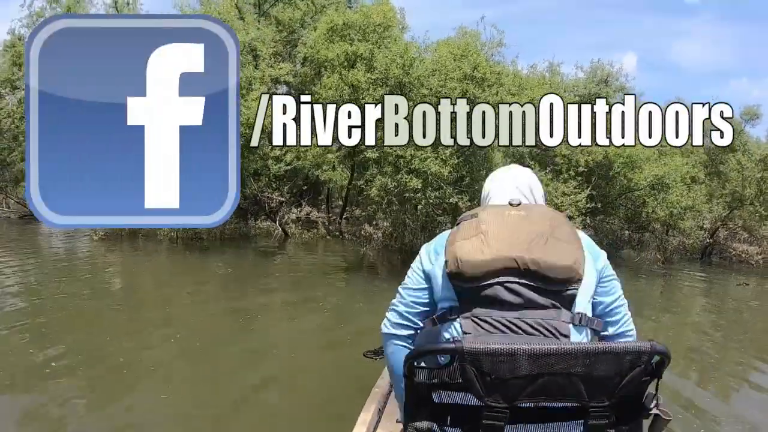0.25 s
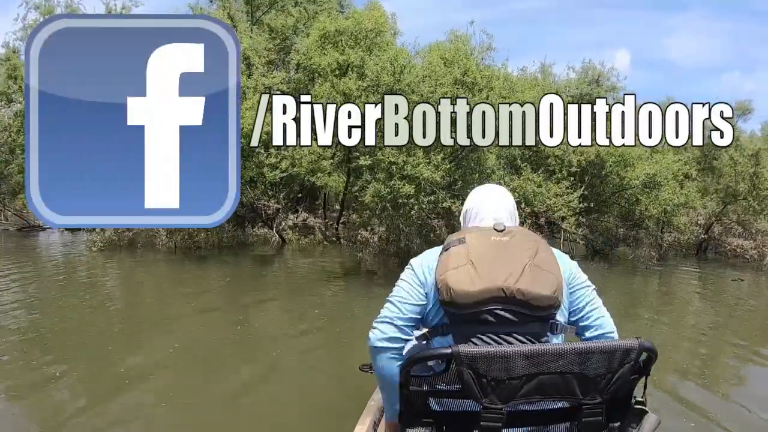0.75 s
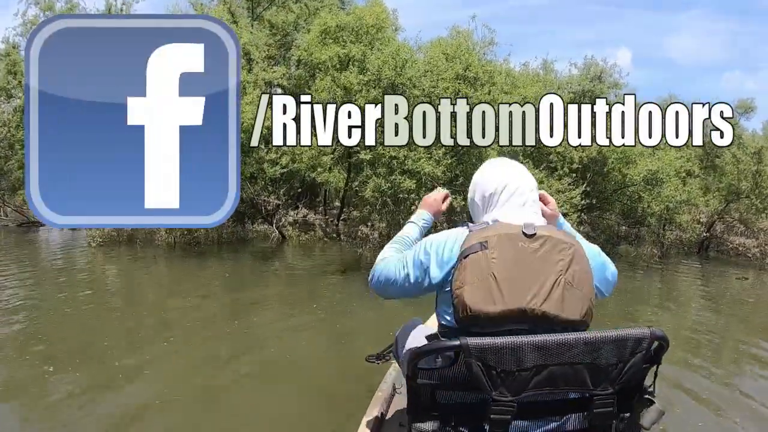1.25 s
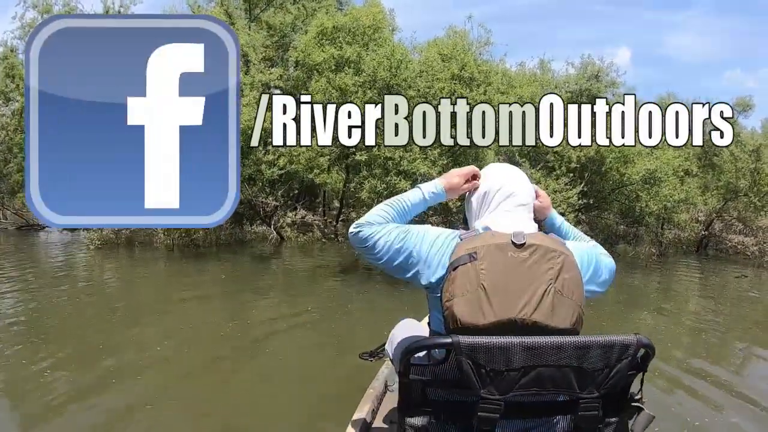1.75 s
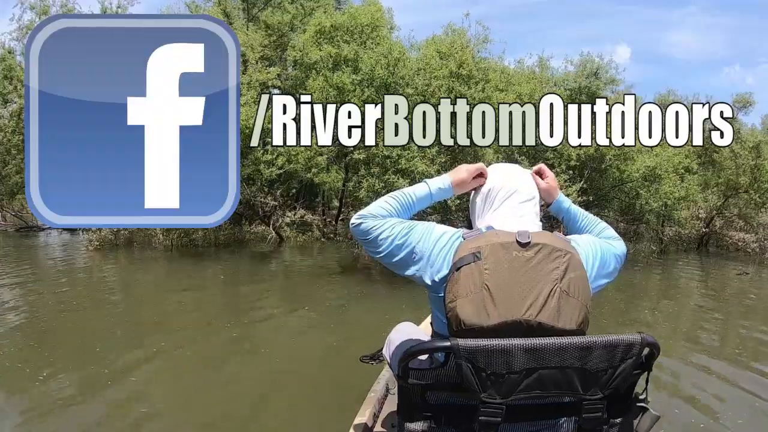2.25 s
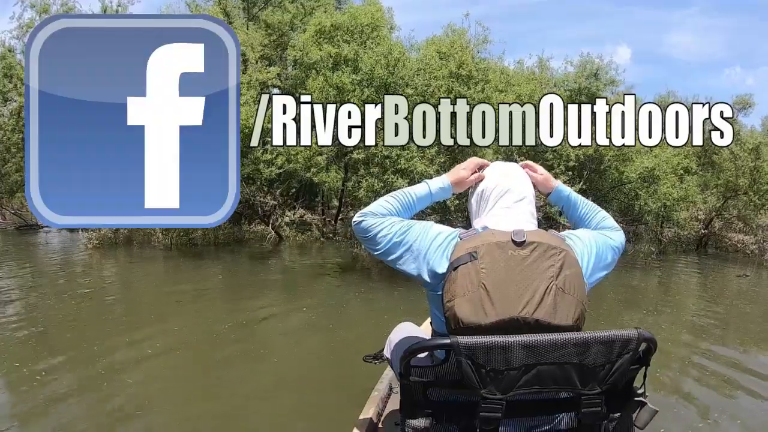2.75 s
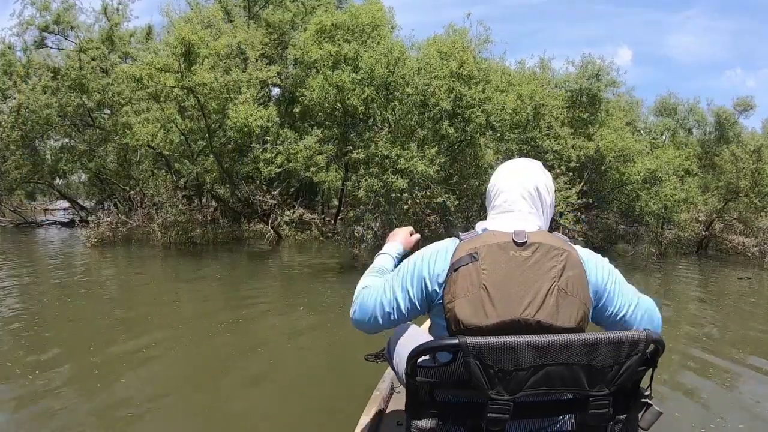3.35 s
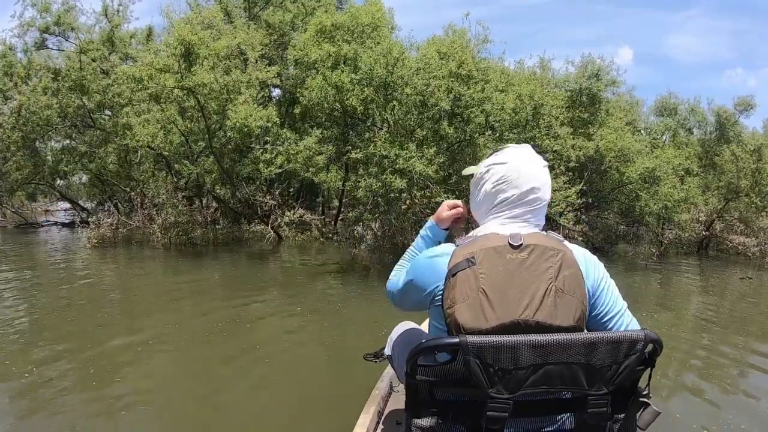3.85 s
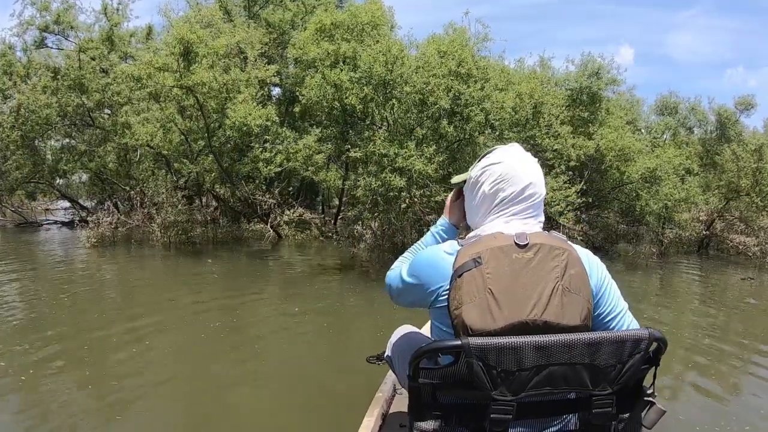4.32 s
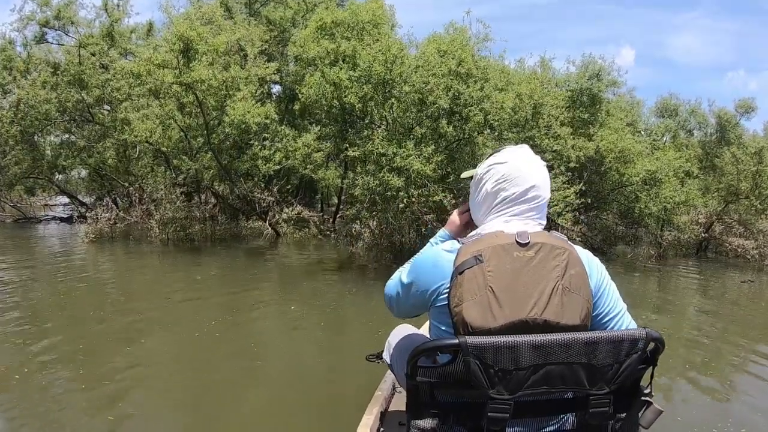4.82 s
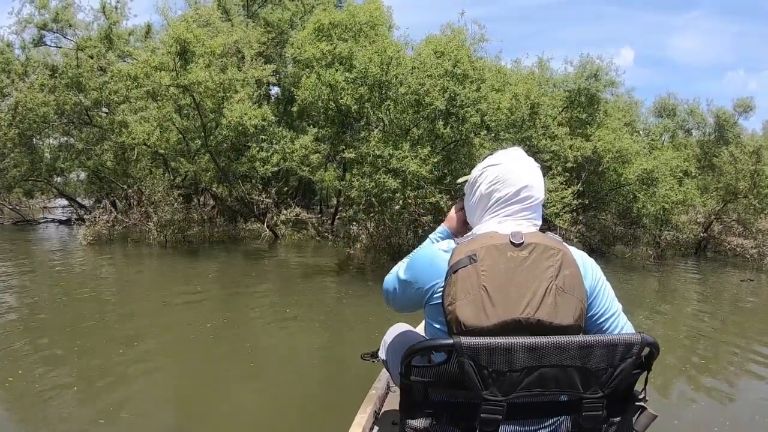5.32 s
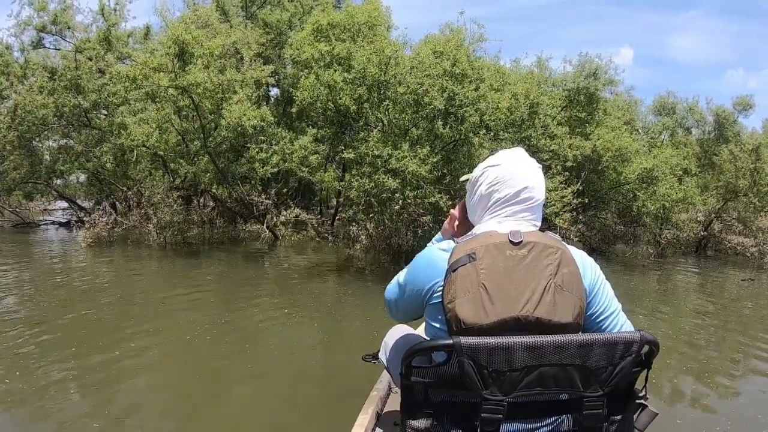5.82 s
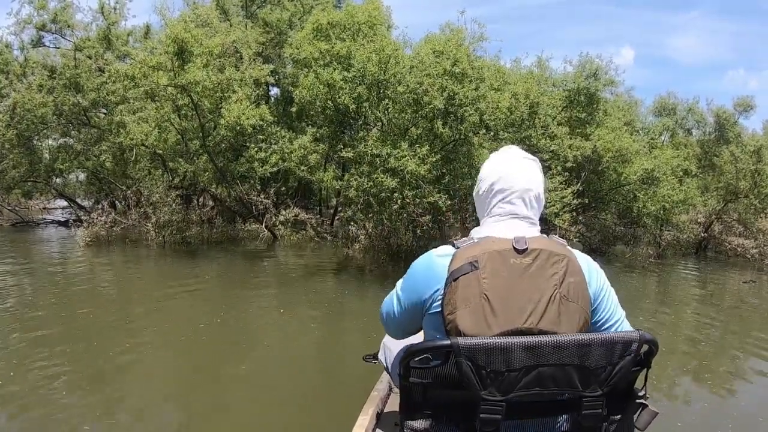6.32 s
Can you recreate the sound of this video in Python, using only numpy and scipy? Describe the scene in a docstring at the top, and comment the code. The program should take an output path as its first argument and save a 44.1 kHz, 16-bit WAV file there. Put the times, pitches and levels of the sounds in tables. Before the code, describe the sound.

Stereo, from the stern of a small boat beside a wooded bank. From 0 to 1.1 s the near right side is busy: low hull rumbles and lurches, seat scuffing, cloth and gear swishing around 0.3 s, tiny drops near 0.5 s, a sharp bright knock with a hollow thud at 0.57 s, loose rattling from 0.7 to 0.87 s, a loud short plip at 0.97 s and a dull tap at 1.07 s. At about 1.16 s a small electric motor starts, glides upward for under a second, and hums low and steady to the end at 6.5 s, creeping slightly higher after 4 s. A far engine drones beneath a murmur and slowly freshening breeze. Left of centre, songbirds warble from 1.5 s; arched whistles repeat between 3 and 4 s, short chirps come at 5.3 and 6.1 s, with thin peeps, faint twitters and hoots near 2.6 and 5.7 s, softly echoed by trees.

```python
"""A lake by a wooded bank, heard from the stern of a kayak with two microphones.
Far off, an engine drones in a few steady tones under a murmur and a light breeze of coloured noise.
Close by, on the right, gear slides as noise and knocks as damped modes, and drops fall as short bubbles.
A small electric motor spins up and hums as three orders of its shaft speed.
On the left, songbirds chirp and whistle in gliding tones, which the trees scatter into a soft echo."""
import sys
import numpy as np
from scipy import signal
from scipy.fft import rfft, irfft, next_fast_len
from scipy.io import wavfile
from scipy.ndimage import map_coordinates

SR = 44100
rng = np.random.default_rng(int(sys.argv[2]) if len(sys.argv) > 2 else 0)


def transcribe(signal):
    """Save signal, clipped to [-1, 1], as a 16-bit WAV file at the path in sys.argv[1]."""
    frames = np.atleast_2d(signal).T
    limited = np.clip(frames, -1, 1)
    pcm = np.round(limited * 32767).astype(np.int16)
    wavfile.write(sys.argv[1], SR, pcm)


N = 290001  # length [samples]


def amp(db):
    """Decibels to gain."""
    return 10 ** (np.asarray(db) / 20)


def unit(x):
    """Scale to rms 1."""
    return x / np.sqrt(np.mean(x ** 2) + 1e-20)


def along(points, hz):
    """Read (frequency [Hz], value) points on a log frequency axis."""
    f, v = np.transpose(points)
    return np.interp(np.log(hz + 1), np.log(f + 1), v)


def wobble(rate, size=16):
    """A smooth random curve, rate knots a second, drawn every size samples."""
    at = np.arange(0, N, size)
    knots = rng.standard_normal(int(N * rate / SR) + 4)
    return np.interp(np.arange(N), at, map_coordinates(knots, [at * rate / SR]))


def filtered(x, response):
    """x times a response of frequency."""
    size = next_fast_len(N + SR // 2)
    return irfft(rfft(x, size) * response(np.fft.rfftfreq(size, 1 / SR)), size)[..., :N]


def pan(left_db):
    """Microphone gains, averaging 1, for a left-minus-right level."""
    gains = amp([[left_db / 2], [-left_db / 2]])
    return gains / gains.mean()


def noise(spectrum, side_db):
    """Coloured stereo noise of rms 1; side_db sets its width, side re mid."""
    mid, side = filtered(rng.standard_normal((2, N)), lambda hz: amp(along(spectrum, hz)))
    side = amp(side_db) * side
    return unit(np.array([mid + side, mid - side]))


def add(track, s, sound):
    """Mix a sound into a track at time s."""
    start = round(s * SR)
    part = sound[..., max(-start, 0):N - start]
    track[..., max(start, 0):][..., :part.shape[-1]] += part


def stroke(start, end, rise_s, fall_s):
    """A gain that swells, holds at 1 from start to end and dies away; rise_s and fall_s are per 60 dB."""
    t = np.arange(N) / SR
    before, after = np.maximum(start - t, 0), np.maximum(t - end, 0)
    return np.exp(-np.log(1000) * (before / rise_s + after / fall_s))


STRAY_HZ = 1340  # by this pitch a mode reaches the two microphones about a radian apart


def ring(modes, t, shift=0.0):
    """Damped modes, struck at slightly new strengths and pitches; the left microphone hears high ones out of step."""
    total = 0
    for k, (hz, db, t60) in enumerate(modes):
        strength, stray, tune = rng.standard_normal(3)
        phase = np.array([[stray * hz / STRAY_HZ], [0]])
        tone = np.sin(2 * np.pi * hz * (1 + shift * tune) * t + phase)
        total = total + (-1) ** k * amp(db + strength - 60 * t / t60) * tone
    return total


# the shadow on near sounds from the right: (frequency [Hz], left minus right [dB])
SHADOW = [(60, -2), (150, -2), (500, -2.5), (1000, -8), (1800, -15.5), (5500, -6), (9000, -1)]
LAG_S = .000026  # the left microphone hears them this much later


def on_deck(x):
    """A near sound on the right reaches the left microphone shadowed and LAG_S later."""
    def ports(hz):
        left_db = along(SHADOW, hz)
        gains = amp([left_db / 2, -left_db / 2])
        lag = np.exp(np.pi * 1j * hz * LAG_S * np.array([[-1], [1]]))
        return gains / gains.mean(axis=0) * lag
    return filtered(x, ports)


# colour of the low outdoor murmur: (frequency [Hz], level [dB per Hz])
MURMUR = [(50, -15), (100, -0.5), (170, -0.5), (240, -6), (330, -5), (450, -19), (700, -29.5), (2000, -120)]
# colour of the breeze in the leaves: (frequency [Hz], level [dB per Hz])
BREEZE = [(240, -29), (400, -5), (458, -2.5), (708, -8), (867, -2), (1020, -10.5), (1200, -4.5),
          (1560, -13), (3510, -19.5), (4670, -29.5), (7120, -36.5), (10300, -49), (13400, -79),
          (22000, -120)]
MURMUR_DB = -52.5
BREEZE_DB, BREEZE_DB_PER_S = -67.5, 1.375  # level at first; the breeze slowly freshens


def air():
    """A low outdoor murmur and a light, freshening breeze in the leaves: noise with slow random swells."""
    breeze_db = BREEZE_DB + BREEZE_DB_PER_S * np.arange(N) / SR
    swell, gust = 1.6 * wobble(5), .7 * wobble(4)
    murmur = amp(MURMUR_DB + swell) * noise(MURMUR, side_db=-11.5)
    return murmur + amp(breeze_db + gust) * noise(BREEZE, side_db=-1.5) * pan(1)


# the far engine's steady orders: (frequency [Hz], level [dB])
DRONE = [(126.5, -54), (189.8, -57.5), (253, -56.5), (506, -74)]
DRONE_PEAK_S, DRONE_FADE_DB_PER_S = 3.72, 1  # loudest then, and fainter before and after


def far_engine():
    """A steady drone that slowly swells and recedes; its orders fade in and out on their way over the water."""
    t = np.arange(N) / SR
    drone = 0
    for hz, db in DRONE:
        fading = amp(db + 3.4 * wobble(2.624))
        drone = drone + fading * np.sin(2 * np.pi * hz * t + 0.19 * wobble(5.1))
    return np.sqrt(2) * drone * amp(-DRONE_FADE_DB_PER_S * np.abs(t - DRONE_PEAK_S)) * pan(0)


# colour of sliding cloth, and of the spray from a drop: (frequency [Hz], level [dB per Hz])
SWISH = [(200, -7.5), (450, -11), (900, -5.5), (1700, 1), (2600, 0), (4000, -8), (5500, -7), (7200, -7),
         (10000, -16), (13000, -43)]
CRINKLES_PER_S = 240


def crinkles():
    """Sparse tiny snaps of cloth, of uneven size, rms 1."""
    snaps = (rng.random(N) < CRINKLES_PER_S / SR) * rng.uniform(-1, 1, (2, N))
    return unit(filtered(snaps, lambda hz: amp(along(SWISH, hz))))


# the hull lurches as weight shifts or a ripple meets it: (time [s], level [dB], t60 [s])
LURCHES = [(0, -36, 0.34), (.16, -35, 0.27), (.21, -33, 0.3), (0.284, -29, 0.13), (0.394, -39.5, 0.28),
           (.6, -34.5, 0.96), (.87, -39, 0.11), (1.08, -40.5, 0.44), (5.15, -51.5, 1.1)]
# colour of the hull's rumble: (frequency [Hz], level [dB per Hz])
RUMBLE = [(15, -18), (30, -11.5), (57, 7.5), (85, -4.5), (118, 1.5), (160, -17), (300, -44), (600, -120)]
# colour of its deep heave: (frequency [Hz], level [dB per Hz])
HEAVE = [(15, -11.5), (28, 0.5), (42, 2.5), (90, -21.5), (200, -120)]
# small ticks of buckles and cloth: (time [s], level [dB])
TICKS = [(0.143, -55.5), (0.18, -52.5), (0.989, -55.5), (5.92, -63)]
# colour of the scuffing on the seat: (frequency [Hz], level [dB per Hz])
SCUFF = [(50, -21), (100, 5), (170, 3), (240, -2.5), (330, -6), (450, -17.5), (900, -20), (1500, -25),
         (3500, -27), (7000, -55), (12000, -79)]
LURCH_RISE_S, ROCKING_DB, HEAVE_DB = 0.086, -60, -7.5  # swell per 60 dB; steady rocking; heave re the lurch
SLIDE_S, SLIDE_END_S, SLIDE_DB = 0.29, 0.38, -55.5  # cloth and gear slide at full level between these times
SLIDE_RISE_S, SLIDE_FALL_S = 0.99, 1.3  # times to swell and fade by 60 dB
RUSTLE_DB, CRINKLE_DB = -76.5, -12.5  # faint steady rustle; the snaps re the slide
TICK_RISE_S, TICK_T60_S = 0.0044, 0.04
SHUFFLE_END_S, SHUFFLE_FALL_S, SHUFFLE_DB = 0.78, 0.95, -44.5  # when scuffing stops, its t60, its level


def boat():
    """The hull rumbles and heaves over a gentle rocking, cloth and gear swish and the seat is scuffed: shaped noise."""
    powers = [(amp(db) * stroke(s, s, LURCH_RISE_S, t60)) ** 2 for s, db, t60 in LURCHES]
    lurch = np.sqrt(sum(powers))
    lumps_db = 1.5 * wobble(4) + 2 * wobble(14)
    rumble = np.hypot(lurch, amp(ROCKING_DB)) * amp(lumps_db) * noise(RUMBLE, side_db=-11.5)
    heave = amp(HEAVE_DB) * lurch * noise(HEAVE, side_db=0)

    slide = amp(SLIDE_DB) * stroke(SLIDE_S, SLIDE_END_S, SLIDE_RISE_S, SLIDE_FALL_S)
    ticks = sum(amp(db) * stroke(s, s, TICK_RISE_S, TICK_T60_S) for s, db in TICKS)
    rubbing = np.hypot(slide + ticks, amp(RUSTLE_DB)) * amp(1.0 * wobble(60))
    swish = rubbing * noise(SWISH, side_db=-2.5)
    crinkle = amp(CRINKLE_DB) * slide * crinkles()

    shuffle = amp(SHUFFLE_DB + 2.6 * wobble(21)) * stroke(0, SHUFFLE_END_S, 1, SHUFFLE_FALL_S)
    scuff = shuffle * noise(SCUFF, side_db=-9.0)
    return on_deck(rumble + heave + swish + crinkle) + scuff


# drops on the water: (time [s], starting pitch [Hz], level [dB], t60 [s], splash re bubble [dB])
DROPS = [(.492, 6700, -38, .029, -3.5), (.528, 2040, -41, 0.04, -19.5), (.923, 2000, -52, 0.064, -5.5),
         (.973, 1415, -19, 0.024, -23.5)]


def drops():
    """A tick of splash with a small bubble whose pitch rises as it dies."""
    water, t = np.zeros((2, N)), np.arange(SR // 10) / SR
    spray = noise(SWISH, side_db=-1)
    for s, hz, db, t60, splash_db in DROPS:
        tone = np.sin(2 * np.pi * hz * t * (1 + 0.0192 * t / t60))
        bubble = tone * amp(-60 * t / t60) * (1 - np.exp(-t / 0.00097))
        splash = spray[:, round(s * SR):][:, :len(t)] * amp(splash_db - 60 * t / 0.021)
        add(water, s, amp(db) * (bubble + splash))
    return on_deck(water)


# gear striking the hull:
# (time [s], piece, level [dB], thud re blow [dB], brightness [Hz], chatter [dB], chatter t60 [s])
KNOCKS = [(.567, "gear", -20.5, 1, 8860, 1, 0.045), (.698, "loose", -37, -6, 4800, 4, 0.047),
          (.765, "loose", -44, 2, 4500, 3, .04), (.804, "loose", -44, -3, 1470, 8, 0.088),
          (.824, "loose", -51, -3, 1990, -2, .06), (.842, "loose", -53, -1, 2400, 0, 0.14),
          (.871, "loose", -52.5, 3.5, 990, 10.5, 0.06), (1.07, "loose", -52.5, 10, 595, 12, 0.1)]
# what the gear rings with: (frequency [Hz], level [dB], t60 [s])
GEAR = [(441, -12, 0.11), (630, -12, 0.093), (841, -16, .076), (1154, -17, 0.094), (1477, 0, 0.098),
        (2083, -5.5, 0.042), (2400, 4.5, 0.037), (2940, -4.5, 0.026), (3987, -1.5, 0.04),
        (4420, -5.5, .035), (5110, -9.5, 0.073), (6120, -5.5, .027), (6800, -7, .038)]
# what the loose piece rings with as it rattles to rest: (frequency [Hz], level [dB], t60 [s])
LOOSE = [(436.4, -1.5, 0.15), (854, -2, 0.071), (1146, -5, 0.086), (1592, -1, 0.092), (1806, 3.5, 0.067),
         (2025, 0, 0.049), (2880, 2, 0.042), (4270, -12, .04)]
# the hollow hull: (frequency [Hz], level [dB], t60 [s])
HULL = [(133.5, -2.5, 0.18), (226.6, -1, 0.17), (262.4, 4, 0.081), (322, -8.5, 0.1)]
# colour of the chatter: (frequency [Hz], level [dB per Hz])
CHATTER = [(250, -13.5), (600, -1.5), (1000, -4), (1700, -3.5), (2500, -10.5), (4000, -11), (7000, -17),
           (10000, -27), (13000, -44)]
# each piece's modes, and the share by which they shift with the way it lands
RINGS = {"gear": (GEAR, 0), "loose": (LOOSE, .025)}
CONTACT_S, THUD_S = 0.00069, 0.0026  # time constants in which a blow and its thud build


def knocks():
    """Each blow rings the piece that strikes, chatters for a moment, is dulled by a low-pass and thuds in the hull."""
    gear, hull, t = np.zeros((2, N)), np.zeros((2, N)), np.arange(SR // 2) / SR
    grit = noise(CHATTER, side_db=-3) * amp(3.5 * wobble(420))
    for s, piece, db, thud_db, bright_hz, chatter_db, t60 in KNOCKS:
        chatter = grit[:, round(s * SR):][:, :len(t)] * amp(chatter_db - 60 * t / t60)
        contact = signal.butter(2, min(bright_hz, SR / 3), fs=SR, output="sos")
        modes, shift = RINGS[piece]
        blow = (ring(modes, t, shift) + chatter) * (1 - np.exp(-t / CONTACT_S))
        add(gear, s, amp(db) * signal.sosfilt(contact, blow))
        add(hull, s, amp(db + thud_db) * ring(HULL, t) * (1 - np.exp(-t / THUD_S)))
    return on_deck(gear + hull)


START_S, START_HZ, CRUISE_HZ = 1.16, 98.25, 144.86  # the motor takes hold; shaft speed at first and cruising
SPIN_UP_S = .4  # time constant of the spin-up
CREEP_S, CREEP_HZ_PER_S = 4.1, 2.3  # from then on it creeps faster
HUM_DB, HUM_DB_PER_OCTAVE = -46, 20  # first order at cruising speed, and its growth with speed
MOUNT_HZ, MOUNT_WIDTH_HZ, SECOND_DB = 283.4, 12.1, -4.5  # the mount's resonance; second order there re the first
THIRD_DB, PULL_DB = -71, 15  # third order when cruising, and its rise under load


def motor():
    """The electric motor spins up, with a strong third order while it pulls, and hums louder the faster it runs."""
    t = np.arange(N) / SR
    pull = np.exp(-np.maximum(t - START_S, 0) / SPIN_UP_S)
    hz = CRUISE_HZ - (CRUISE_HZ - START_HZ) * pull + CREEP_HZ_PER_S * np.maximum(t - CREEP_S, 0)
    turn = 2 * np.pi * np.cumsum(hz * (1 + 0.0016 * wobble(17))) / SR
    first = amp(HUM_DB + HUM_DB_PER_OCTAVE * np.log2(hz / CRUISE_HZ))
    # the mount's resonance lifts the second order
    second = first * amp(SECOND_DB) / np.hypot(1, 2 * (2 * hz - MOUNT_HZ) / MOUNT_WIDTH_HZ)
    third = amp(THIRD_DB + PULL_DB * pull)
    hum = first * np.sin(turn) + second * np.sin(2 * turn) + third * np.sin(3 * turn)
    return np.sqrt(2) * stroke(START_S, t[-1], 0.27, 1) * hum * amp(0.58 * wobble(12)) * pan(0)


ECHO_SIDE_DB = -7.5  # width of the echoes, side re mid
LEAVES_T60_S = 0.12  # how long the nearest leaves smear a note


def leaves(x):
    """The leaves around a bird smear its notes with dense, quickly fading reflections."""
    t = np.arange(SR // 4) / SR
    mid, side = rng.standard_normal((2, len(t))) * amp(-60 * t / LEAVES_T60_S)
    tail = mid + amp(ECHO_SIDE_DB) * np.array([side, -side])
    return signal.fftconvolve(x[None], tail / np.linalg.norm(tail[0]), axes=1)[:, :N]


# how long the wooded bank echoes: (frequency [Hz], t60 [s])
TREES = [(400, 0.21), (2500, 1), (4500, 0.97), (8000, 0.26)]


def trees(x, build):
    """Trunks and leaves scatter a sound into a tail that builds up over build seconds and dies away."""
    hz, t, z = signal.stft(rng.standard_normal((2, SR)), SR, nperseg=256)
    decay = amp(-60 * t / along(TREES, hz)[:, None])
    mid, side = signal.istft(z * decay * (1 - np.exp(-t / build)), SR, nperseg=256)[1]
    tail = mid + amp(ECHO_SIDE_DB) * np.array([side, -side])
    # rms gain of 1 from 2 to 5 kHz
    tail = tail / np.sqrt(np.mean(np.abs(rfft(tail, SR)[:, 2000:5000]) ** 2))
    return signal.fftconvolve(x[None], tail, axes=1)[:, :N]


def sing(notes, edge, waver, flutter_db):
    """Pure notes that glide through their pitches and swell and fade at their edges (edge: share of the note)."""
    voice, drift, flutter = np.zeros(N), wobble(400), wobble(150)
    for s, length, *pitches, db in notes:
        u = np.linspace(0, 1, int(length * SR))
        at = np.arange(len(u)) + round(s * SR)
        glide = np.polyfit(np.linspace(0, 1, len(pitches)), pitches, len(pitches) - 1)
        hz = np.polyval(glide, u) * (1 + waver * drift[at])
        swell = np.sin(np.pi / 2 * np.clip(np.minimum(u, 1 - u) / edge, 0, 1))
        tone = np.sin(2 * np.pi * np.cumsum(hz) / SR)
        add(voice, s, np.sqrt(2) * amp(db + flutter_db * flutter[at]) * swell * tone)
    return voice


# runs of quick notes from deep in the trees:
# (start [s], end [s], first pitch [Hz], last pitch [Hz], level [dB])
RUNS = [(1.187, 1.23, 4280, 4170, -73), (1.249, 1.369, 3370, 2590, -71.5),
        (5.508, 5.618, 4310, 3620, -70.5), (5.738, 5.985, 4070, 3580, -71.5),
        (6.072, 6.32, 3950, 4160, -75)]
RUN_NOTE_S, RUN_SWEEP = 0.023, 0.13  # length of each note; typical sweep either side of the trend, as a share


def twitter():
    """Far birds' runs of quick notes, each note sweeping down through the run's trend."""
    notes = []
    for start, end, first_hz, last_hz, db in RUNS:
        for s in np.arange(start, end, RUN_NOTE_S):
            trend_hz = np.interp(s, [start, end], [first_hz, last_hz])
            sweep = np.exp(RUN_SWEEP * (np.array([1, -1]) + rng.uniform(-.5, .5, 2)))
            notes.append((s, RUN_NOTE_S, *(trend_hz * sweep), db))
    return sing(notes, edge=0.23, waver=.03, flutter_db=-1)


# an arched whistle, repeated, then faint returns of it from the bank: (time [s], level [dB])
WHISTLES = [(-.045, -54.5), (3.045, -60.5), (3.274, -57), (3.511, -55.5), (3.744, -55), (3.982, -55.5),
            (4.198, -69), (4.349, -77), (5.004, -70)]
# the whistle's arch, which droops at the end: (pitch [Hz]), evenly spaced through the note
WHISTLE_HZ = [2617, 2787, 2803, 2805, 2640]


def whistler():
    """A bird at the edge of the trees whistles arches, then faint returns; a softer, lower syllable follows each."""
    arch_notes = [(s, .084, *WHISTLE_HZ, db) for s, db in WHISTLES]
    soft_notes = [(s + .1, .07, 2500, 2650, 2560, db - 7.0) for s, db in WHISTLES]
    arches = sing(arch_notes, edge=.28, waver=.003, flutter_db=1)
    soft = sing(soft_notes, edge=0.18, waver=.03, flutter_db=2.0)
    direct = (arches + amp(-3) * soft) * pan(6)
    return direct + trees(amp(-6) * arches + soft, build=.02) * pan(4.5)


# slurred phrases: (part passing straight through the leaves [dB],
# turning points as (time [s], pitch [Hz], level [dB]))
SONG = [ (-8.5, [(1.47, 5440, -77), (1.505, 4700, -69), (1.545, 4260, -62.5), (1.578, 3160, -67),
        (1.636, 5120, -68)]), (-10, [(2.088, 3980, -65.5), (2.125, 3100, -65)]), (-3, [(2.136, 3810, -60.5),
        (2.165, 2853, -61.5), (2.238, 2700, -64.5), (2.293, 2170, -68.5), (2.323, 3150, -59),
        (2.347, 2630, -67)]), (-5.5, [(2.574, 3170, -71), (2.587, 4400, -73), (2.604, 3340, -59),
        (2.634, 4130, -64), (2.655, 5310, -70), (2.675, 3810, -58), (2.703, 2794, -58.5),
        (2.745, 2790, -71)]), (-3, [(2.772, 2875, -63), (2.798, 2500, -62.5), (2.838, 3676, -57),
        (2.882, 2100, -62)]), (-7, [(3.64, 3690, -64), (3.663, 3810, -62), (3.682, 5340, -68.5),
        (3.711, 4150, -59.5), (3.759, 3040, -56.5)]), (-0.5, [(3.765, 3724, -62), (3.878, 3567, -63),
        (3.914, 2800, -57), (3.968, 3070, -57.5), (4.0, 3110, -64)]), (-6, [(4.568, 3180, -64),
        (4.607, 3910, -65), (4.638, 3810, -65.5), (4.662, 4690, -63), (4.687, 4680, -76),
        (4.718, 5050, -72)]), (0, [(4.808, 2550, -59), (4.846, 3370, -66.5), (4.876, 3020, -58.5),
        (4.897, 2200, -65), (4.912, 2720, -59), (4.937, 2890, -59), (4.976, 2065, -67.5)]),
        (-1.5, [(5.659, 3200, -59.5), (5.702, 2230, -65.5)]), (-1.5, [(5.78, 2280, -72),
        (5.82, 2710, -64.5), (5.871, 3406, -67), (5.92, 2785, -61.5), (5.958, 3066, -57.5),
        (5.992, 2420, -68)])]
SONG_EDGE_S, SONG_WAVER, SONG_FLUTTER_DB = .004, 0.0088, 1.9  # fade in and out; unsteady pitch (share) and level


def warble():
    """The songbird's voice, one unbroken tone a phrase, and the part that passes straight through the leaves."""
    voice, drift, flutter = np.zeros((2, N)), wobble(400), wobble(150)
    for direct_db, phrase in SONG:
        s, pitch, db = np.transpose(phrase)
        at = np.arange(round(s[0] * SR), round(s[-1] * SR))
        t = at / SR
        place = np.interp(t, s, np.arange(len(s)))  # position among the turning points
        glide = map_coordinates(pitch, [place], order=2, mode="nearest")
        hz = glide * (1 + SONG_WAVER * drift[at])
        swell = np.clip(np.minimum(t - s[0], s[-1] - t) / SONG_EDGE_S, 0, 1)
        level = np.sqrt(2) * amp(np.interp(t, s, db) + SONG_FLUTTER_DB * flutter[at])
        tone = level * swell * np.sin(2 * np.pi * np.cumsum(hz) / SR)
        add(voice, s[0], np.array([tone, tone * amp(direct_db)]))
    return voice


# clear notes from nearer birds:
# (time [s], length [s], start pitch [Hz], middle pitch [Hz], end pitch [Hz], level [dB])
CHIPS = [(1.195, 0.075, 4120, 4070, 4070, -69), (4.405, 0.088, 2815, 2894, 3330, -68.5),
         (4.666, 0.072, 3180, 3240, 2910, -65), (5.281, 0.04, 3160, 3670, 2950, -61.5),
         (5.412, 0.038, 3120, 3660, 2950, -61), (5.645, 0.15, 3280, 3196, 3250, -69.5),
         (6.131, 0.041, 3860, 3520, 3400, -60.5), (6.241, 0.038, 3850, 3510, 3410, -61)]
# thin high peeps: (time [s], level before the mix [dB])
PEEPS = [(2.886, -78), (3.369, -76), (3.709, -74), (4.219, -73), (5.135, -78), (5.16, -75.5)]
# a far waterbird's hoots:
# (time [s], length [s], start pitch [Hz], middle pitch [Hz], end pitch [Hz], level [dB])
HOOTS = [(2.62, 0.12, 495, 651, 522, -54), (5.665, 0.12, 372, 424.6, 363, -54.5)]
LEAVES_DB, ECHO_DB = -6.5, -2.5  # the song as it comes back off the nearest leaves and from the whole bank


def birds():
    """Birds to the left: gliding tones, each kind with its own share of direct sound and of echo off the bank."""
    song, through = warble()
    chips = sing(CHIPS, edge=0.16, waver=0.0041, flutter_db=1.0)
    peep_notes = [(s, .04, 7150, 7000, 7150, db) for s, db in PEEPS]
    peeps = sing(peep_notes, edge=0.37, waver=.012, flutter_db=3.0)
    hoots = sing(HOOTS, edge=.45, waver=.002, flutter_db=.4)
    direct = (through + amp(LEAVES_DB) * leaves(song)) * pan(5)
    direct = direct + chips * pan(2) + (amp(-3.5) * peeps + hoots) * pan(1.5)
    scattered = amp(ECHO_DB) * song + amp(-8) * chips + amp(-5) * peeps + amp(-8) * hoots + twitter()
    return direct + trees(scattered, build=0.011) * pan(4.3)


def scene():
    """Everything heard from the stern."""
    return air() + far_engine() + boat() + drops() + knocks() + motor() + whistler() + birds()


TOP_HZ = 12600


def record(dry):
    """The microphones' signal is kept only below the band limit TOP_HZ."""
    return filtered(dry, lambda hz: hz < TOP_HZ)


dry = scene()
out = record(dry)
transcribe(out)
```